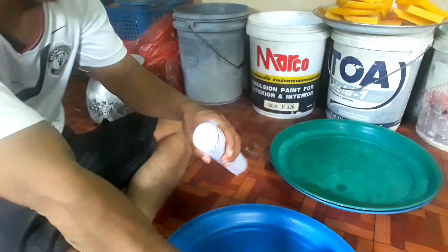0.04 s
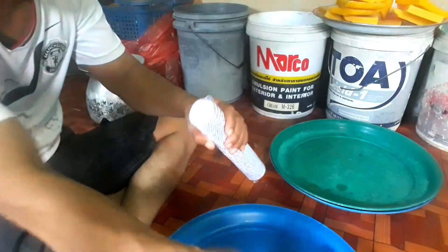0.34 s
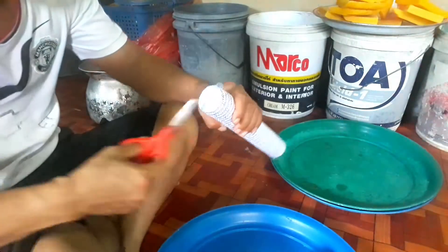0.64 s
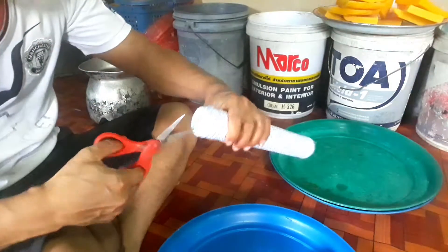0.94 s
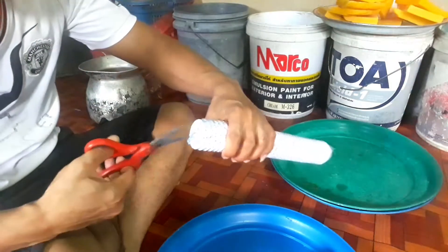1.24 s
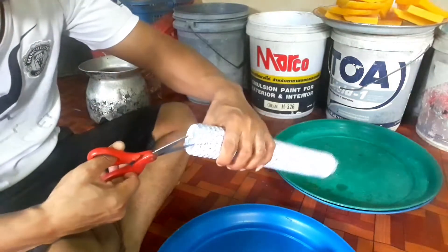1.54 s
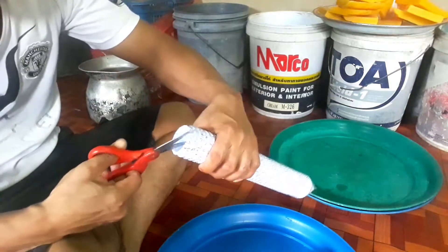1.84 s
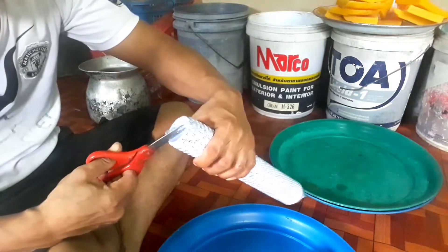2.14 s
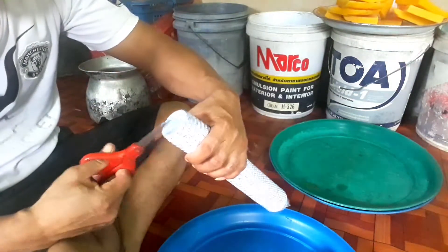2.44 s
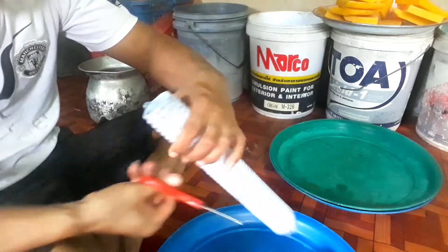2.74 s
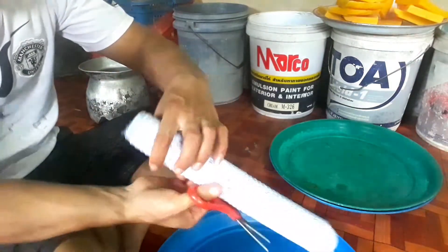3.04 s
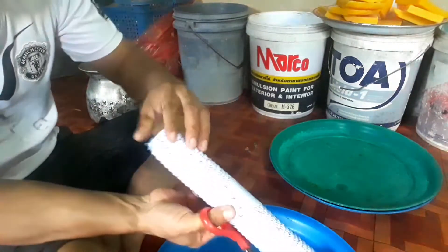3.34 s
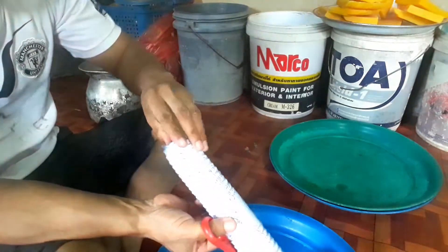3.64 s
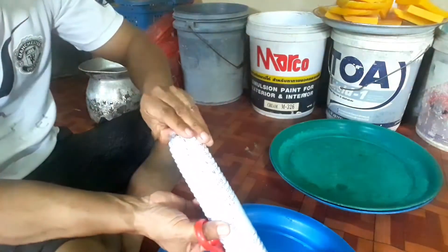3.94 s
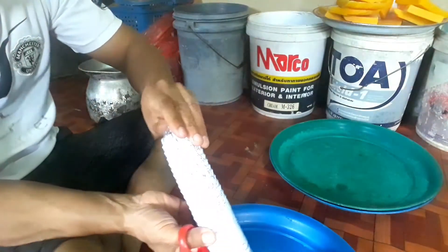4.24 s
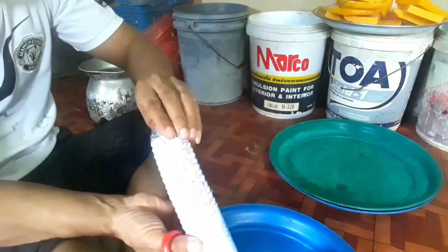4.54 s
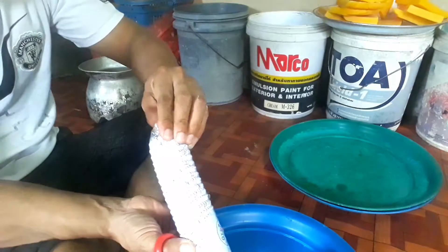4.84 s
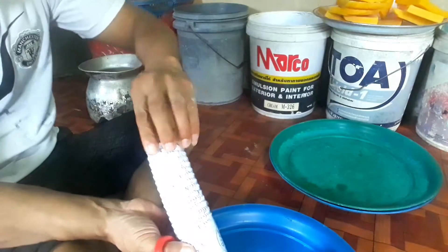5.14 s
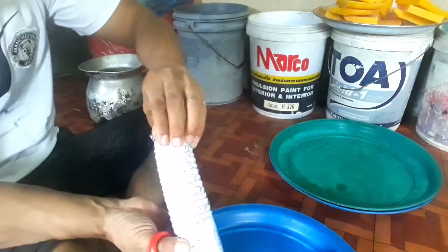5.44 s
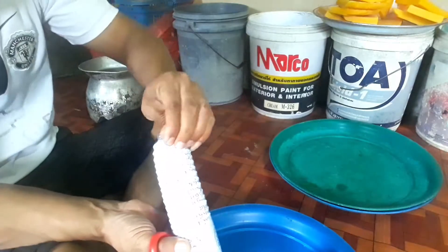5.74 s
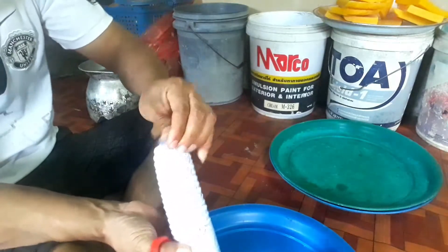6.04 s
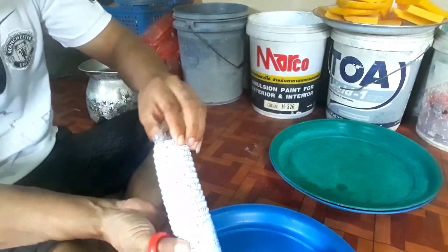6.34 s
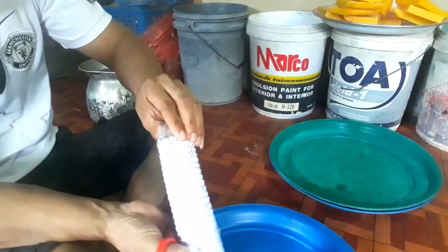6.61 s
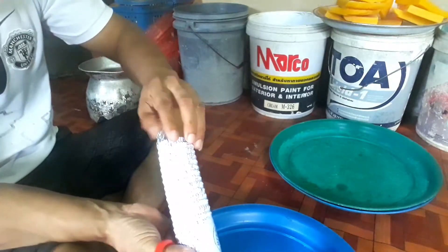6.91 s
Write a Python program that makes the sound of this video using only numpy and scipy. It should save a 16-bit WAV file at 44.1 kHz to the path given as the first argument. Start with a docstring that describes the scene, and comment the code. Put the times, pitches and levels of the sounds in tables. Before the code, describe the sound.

Thin plastic wrap crackles in uneven bursts right by the microphone, first snipped by scissors with a slight squeak and ring, then pulled open by fingers. Paper baking cups slide and rustle softly between the snaps, each crack leaving a short echo in a small room. Behind it, a faint hum and low rush dip and return, with one distant bird chirp at the start and barely audible roosters midway.

```python
"""A small hard-walled room, one phone microphone close to the hands. Scissors squeak, nick the thin
plastic sleeve round a stack of paper baking cups and ring briefly; fingers then pick and tear it open.
The film buckles in sharp snaps, the fluted paper rustles, and the walls answer each crack.
Well off mic, outside, a bird chirps and two roosters crow. Under it all lie a faint motor hum and a
low rush, which dip and return as if ducked by the phone's noise suppression."""
import sys
import numpy as np
from scipy import signal
from scipy.fft import rfft, irfft, next_fast_len
from scipy.io import wavfile
from scipy.ndimage import map_coordinates

SR = 44100
rng = np.random.default_rng(int(sys.argv[2]) if len(sys.argv) > 2 else 0)


def pcm_store(signal):
    """Save signal as 16-bit PCM."""
    levels = np.round(np.clip(np.atleast_2d(signal), -1, 1) * 32767)
    wavfile.write(sys.argv[1], SR, levels.astype(np.int16).T)


N = 316197

# foreground snaps: t/s, relative level/dB, facet f/Hz, low tilt/dB, high tilt/dB, scrape t60/s,
# relative room send/dB
SNAPS = [(0.6926, -35.5, 1560.0, -18.0, -15, 0.037, -2.0), (0.988, -36.5, 1510.0, 12.5, -26.0, 0.012, -3.0),
         (1.1676, -35, 1605, 1, -26, 0.031, 5), (1.1856, -20.0, 1590.0, 1, -26.0, 0.051, -11),
         (1.1905, -20.5, 1600, 0.0, -21.5, 0.021, -11), (1.3002, -35.5, 1620.0, 1.5, -26, 0.031, 1.5),
         (1.336, -12.5, 6440.0, 6.5, -23, 0.043, -6.5), (1.3404, -7.5, 6690, -1.5, -9.0, 0.019, -9.0),
         (1.4304, -13.5, 11500, -21, -4.5, 0.018, -5.5), (1.477, -23.0, 1300.0, -7.5, -11.0, 0.011, -7.5),
         (1.6022, -36.5, 1540.0, -13, -28, 0.045, -6.0), (1.7143, -22, 1490.0, -7.0, -9, 0.047, -6),
         (1.7359, -22.5, 6150.0, 8, -17.0, 0.014, -4.5), (1.7518, -4.5, 2110, -20, -36.0, 0.002, -12),
         (1.7619, -9.5, 2960.0, -1.5, -17.5, 0.0042, 4.5), (1.8714, -22.5, 5400.0, -4.5, -16.0, 0.023, 0.5),
         (1.923, -24.5, 2010, -0.5, -21, 0.016, -3), (2.0851, -25.5, 2210.0, -7.5, -20, 0.018, -8.0),
         (2.156, -30.0, 3160.0, -14.0, -14, 0.016, -7.0), (2.1971, -29, 3250.0, -16, -9.0, 0.006, -8),
         (2.232, -32, 3900, -20, -24, 0.012, -6), (2.2458, -17.5, 1900.0, -7, -13, 0.011, -3.5),
         (2.2553, -16.0, 1850, 6.5, -35.0, 0.055, -8), (2.2976, -13.0, 1860.0, -0.5, -11.0, 0.026, -8.0),
         (2.4061, -30.0, 1890.0, 0.5, -11.5, 0.05, -5.5), (2.9566, -38, 1720.0, 0.0, -13.0, 0.035, -4.0),
         (3.5043, -33.0, 1898, 7.0, -27.0, 0.024, -2), (3.5539, -31.5, 2050, 4.5, -17.0, 0.04, -2),
         (3.5864, -21.0, 2010.0, -5, -14.5, 0.075, -3), (3.6042, -22.5, 1620.0, 2.5, -18, 0.014, 2.0),
         (3.6364, -13.5, 4240, -1, -14.5, 0.019, -6.5), (3.6606, -16.5, 2020.0, -1.5, -18, 0.0091, -1.5),
         (3.8203, -17.5, 6700.0, 11.5, -10.0, 0.016, -9.5), (3.8343, -16, 2000.0, -10, -14.0, 0.011, -3),
         (3.8511, -5.0, 2230, 10.0, -19.5, 0.022, -7.5), (3.878, -19.5, 4330.0, 4, -19, 0.04, -3.5),
         (3.9677, -21.5, 6700.0, -24.0, -2.5, 0.012, -5), (4.0397, -18.5, 6700.0, -7, 3, 0.015, -8.5),
         (4.1473, -25, 1440.0, -10, -10, 0.051, -10), (4.1674, -9.0, 4500, -2.5, -9.5, 0.0089, 10.0),
         (4.2016, -7.0, 2440.0, -15, -19, 0.064, -5.0), (4.3883, -39.5, 6530.0, -6, -13.0, 0.004, 6.5),
         (4.439, -28.0, 3880, -3.5, -10.5, 0.045, -6), (4.5247, -33.0, 6200, -30.0, -16, 0.012, -0.5),
         (4.544, -30.0, 6500.0, -18, -5.5, 0.021, -8), (4.6098, -35.0, 4300.0, -10, -26, 0.052, -6.5),
         (4.6822, -36, 6440.0, -28.5, -17, 0.006, -9.5), (4.8113, -29, 5400, -31.5, 4, 0.014, -6.5),
         (4.875, -43, 5980, -9.5, 0, 0.009, -6.5), (4.9964, -36.5, 5780.0, -7, -16.5, 0.019, -3.5),
         (5.0511, -36.5, 2330.0, -3, -16, 0.013, -1.5), (5.1193, -35, 1890.0, 0.0, -15.0, 0.018, -5),
         (5.1728, -27.5, 2720, 2.5, -12, 0.033, -7.5), (5.299, -29.0, 3500.0, -0.5, -16.0, 0.045, 4.0),
         (5.3259, -30.5, 1900.0, -1.5, -15, 0.014, -1.0), (5.4393, -33, 6460.0, -2.5, -10.0, 0.06, -1.5),
         (5.5983, -32.0, 2000.0, -9, -21.5, 0.031, 3.5), (5.6153, -22, 2050.0, -7, -13.0, 0.04, -10.5),
         (5.6437, -6.5, 6040.0, -13, -20.5, 0.003, 1.0), (5.7, -10.5, 3940.0, -10.5, -18.0, 0.0085, -11),
         (5.9101, -45.5, 6550, -16.5, -25, 0.04, -7), (6.1003, -33.5, 2130.0, -3.5, -16, 0.035, -0.5),
         (6.1442, -36.0, 1950.0, -1, -13.5, 0.022, -6.5), (6.226, -40, 6100, -13, -15, 0.0077, -8),
         (6.5003, -43, 13500, 0, -12, 0.016, 9), (6.5247, -35, 4530, -10, -2, 0.03, 3),
         (6.5354, -9.5, 4480.0, -12, -22.0, 0.004, -8), (6.6037, -25.0, 4260.0, -4.5, -17.5, 0.015, 0),
         (6.6353, -26.5, 6500.0, -14, -10, 0.033, -7), (6.6853, -23.5, 1940, -6.5, -13.0, 0.016, -7),
         (6.7266, -28, 6770.0, -6, -0.5, 0.009, -10.0), (6.8473, -35.0, 13700.0, -23.0, 1.0, 0.019, -6),
         (6.9337, -27.0, 6640.0, -6.0, -12.0, 0.037, -8.0), (7.1567, -32.5, 1960.0, -1.5, -24, 0.039, -2.0)]
FILM_SPECTRUM = [(20, -55.5), (250, -20.5), (720, -3.5), (1000, -2), (1400, 0.5), (2050, 4.5), (2900, 1),
                 (4400, 2), (5300, 3), (6900, 2.5), (7900, -7), (8800, -4), (10500, 5), (15500, 2.5)]  # one flick of the film: f/Hz, relative level/dB
CRINKLING = [(2.02, 2.3, -39), (2.779, 3.06, -47), (3.602, 3.7, -28), (3.93, 4.09, -33), (4.5, 4.72, -44),
             (5.02, 5.36, -41), (6.54, 6.63, -29), (6.75, 6.9, -40)]  # fingers work the film: start/s, end/s, relative level/dB
THUMPS = [(1.19, -39, 260, 0.024), (1.191, -23, 750, 0.017), (1.3371, -27.5, 240, 0.053),
          (1.339, -16.5, 464, 0.031), (1.3405, -13, 787, .02), (1.764, -32, 248, 0.024),
          (2.297, -40, 136, 0.078), (3.853, -32, 253, 0.021), (4.1679, -15, 95, 0.026),
          (4.169, -23.5, 290, 0.0093), (5.6437, -29.5, 114.7, 0.018)]  # knocks of the snips, thumps of the handled stack: t/s, level/dB, f/Hz, t60/s
PAPER_SPECTRUM = [(150, -25), (700, -5), (1500, -6.5), (2050, 3.5), (2900, -8.5), (4400, 1.5), (5200, -1.5),
                  (6600, -0.5), (8200, -25.5), (11000, -15), (15500, -16)]  # sliding paper: f/Hz, relative level/dB
STROKES = [(.02, -56.5, .15), (.19, -58, .12), (.6, -47.5, .18), (1.19, -43, .16), (1.79, -50, .16),
           (2.92, -58, 0.28), (3.675, -41, .125), (3.9, -43.5, 0.11), (4.7, -61, .14), (5.45, -56.5, .27),
           (6.08, -63, 0.26), (6.41, -63, .14), (6.99, -52, .18)]  # fingers along the stack: fastest t/s, relative level/dB, 20 dB fade/s
BLADE_MODES = [(760, -44, 0.31), (1580, -53, .26), (1938, -49, .2), (3620, -46.5, .22), (6515, -53, .6),
               (6500, -47.5, 0.56)]  # ringing steel: f/Hz, level/dB, t60/s
SQUEAK = [(.95, 1615, -78), (.99, 1605, -56), (1.09, 1597, -53), (1.15, 1588, -60), (1.19, 1586, -76)]  # the scissors' pivot: t/s, f/Hz, level/dB
SQUEAK_PARTIALS = [(1, -11.5), (2, 2), (3, -0.5), (4, -6.5)]  # its timbre: harmonic, relative level/dB
BRUSHES = [(0.146, -42, 0.011, 1590), (.615, -48, 0.034, 2300), (1.018, -50.5, 0.017, 1500),
           (6.4, -60, 0.012, 1900)]  # hands on clothes: t/s, level/dB, width/s, centre f/Hz
REACH = [(0, -63), (.35, -62.5), (.6, -66), (.9, -100)]  # rumble of the reaching arm: t/s, level/dB
CROW = [(2.66, 837, -76.5), (2.76, 839, -60.5), (2.85, 812, -66), (2.96, 807.4, -58), (3.1, 803, -65),
        (3.26, 804, -64.5), (3.4, 779, -65.5), (3.54, 780, -65), (3.66, 729, -87.5)]  # a distant rooster: t/s, f/Hz, level/dB
CROW_PARTIALS = [(1, -2), (2, 0.5), (3, -21)]  # its timbre: harmonic, relative level/dB
SECOND_CROW = [(2.9, 740, -75.5), (3.03, 739, -58), (3.14, 704, -62), (3.29, 691, -69.5), (3.44, 651, -56),
               (3.6, 650, -81.5)]  # a second distant rooster, lower in pitch: t/s, f/Hz, level/dB
SECOND_PARTIALS = [(1, -3), (2, -14), (3, -10.5)]  # its timbre: harmonic, relative level/dB
CHIRP = [(.32, 6530, -71), (.345, 6090, -49.5), (.365, 4870, -53.5), (.395, 4200, -60), (.42, 3460, -66),
         (.48, 3330, -76), (.5, 3300, -85)]  # one falling bird call: t/s, f/Hz, level/dB
MOTOR = (102.3, -10.5)  # a far motor: f/Hz, level/dB against BACKGROUND_LEVEL
# the background, ducked and released as by the phone's noise suppression: t/s, relative level/dB
BACKGROUND_LEVEL = [(0, -50), (.58, -55.5), (1.1, -54), (1.38, -51), (1.78, -58), (2.1, -65), (2.38, -60.5),
                    (2.58, -66.5), (3.0, -62.5), (3.43, -62.5), (3.77, -52.5), (4.13, -56), (4.51, -66),
                    (5.11, -74), (5.55, -59.5), (5.95, -64.5), (7.17, -65.5)]
BACKGROUND_SPECTRUM = [(15, -38.5), (25, -15.5), (50, -5), (152, 0), (267, -7), (648, -4.5), (848, -6),
                       (1240, -5), (1570, -11), (1900, -17), (2170, -19), (3930, -22), (5430, -25.5),
                       (6730, -25.5), (8810, -49), (15500, -34.5)]  # the low rush: f/Hz, relative level/dB
ROOM_DECAY = [(200, 0.1), (600, 0.25), (1500, 0.23), (4000, 0.22), (6500, 0.24), (10000, 0.23), (15000, .2)]  # the room's tail: f/Hz, t60/s
ECHO_BUILD = [(0, 0.14), (.003, .3), (.009, .4), (0.01, 0.76)]  # floor first, then the walls: t/s after the sound, relative gain


def snaps(rows, gain_db, room_db, scrape, facet_db, facet_octaves, size=1024):
    """Right at the mic, each buckle flicks a facet of film, then tiny creases scrape and die away."""
    out, hz, t = np.zeros(N), np.fft.rfftfreq(size, 1 / SR), np.arange(2 * size) / SR
    # wide facets radiate the lows, tight creases the highs
    low_share = along([(250, 0.24), (700, 1.2), (1450, 0.97), (2000, 0.66), (3800, 0)], hz)
    high_share = along([(7200, 0.041), (9000, 0.93)], hz)
    for s, db, facet_hz, low_db, high_db, t60, send_db in rows:
        strength = amp(db + gain_db) * np.sqrt(SR / 1000)
        resonance = 1 / (1 + (np.log2((hz + 1) / facet_hz) / facet_octaves) ** 2)
        tilt_db = low_db * low_share + high_db * high_share
        flick = causal(amp(along(FILM_SPECTRUM, hz) + facet_db * resonance + tilt_db))
        snap = signal.fftconvolve((t == 0) + scrape * creases(t, t60, clump_db=3.5), flick)
        add(out, s, strength * snap / np.linalg.norm(snap))
        # the room gathers every direction, so its echo has the facet's smooth mean colour
        echo = signal.fftconvolve(flick / np.linalg.norm(flick), room_tail())
        add(out, s, strength * amp(send_db + room_db) * echo)
    return out


def creases(t, t60, clump_db, clump_samples=16):
    """Tiny creases give way in clumps: a ragged, dying burst of noise."""
    clumps = np.repeat(rng.standard_normal(len(t) // clump_samples), clump_samples)
    return unit(rng.standard_normal(len(t)) * amp(clump_db * clumps)) * amp(-60 * t / t60)


def crinkles(per_s, centre_hz, octaves, low_db, high_db, scatter_db, t60, send_db):
    """Fingered film buckles faintly at uneven intervals: rows for snaps(), each with its own colour."""
    rows = []
    for start, end, db in CRINKLING:
        slots = np.arange(start, end, 1 / per_s)
        delays, chance = rng.random(32) / per_s, rng.standard_normal((32, 4))
        for s, delay, (force, pitch, low, high) in zip(slots, delays, chance):
            rows.append((s + delay, db + scatter_db * force, centre_hz * 2 ** (octaves * pitch),
                         low_db + scatter_db * low, high_db + scatter_db * high, t60, send_db))
    return rows


def thumps():
    """Low knocks of the scissor snips and thumps of the handled stack push the air out and back."""
    out, t = np.zeros(N), np.arange(SR // 4) / SR
    for s, db, hz, t60 in THUMPS:
        attack = 1 - np.exp(-t / 0.00055)
        swing = amp(db - 60 * t / t60) * np.sin(2 * np.pi * hz * t) * attack
        add(out, s, np.diff(swing) * SR / (2 * np.pi * hz))  # pressure follows the speed of the swing
    return in_room(out, room_db=-9.5)


def rustle(gain_db, grip_db, catches_per_s, spread_db, hiss):
    """Close up, paper slides with each finger stroke: soft hiss and tiny catches of very unequal size."""
    t = np.arange(N) / SR
    catches = (rng.random(N) < catches_per_s / SR) * rng.choice([-1, 1], N)
    sizes = amp(spread_db * np.minimum(rng.exponential(size=N), 3))
    friction = unit(catches * sizes) + hiss * rng.standard_normal(N)
    paper = unit(filtered(friction, lambda hz: amp(along(PAPER_SPECTRUM, hz))))
    strokes = sum(amp(db - 20 * np.abs(t - s) / fade) for s, db, fade in STROKES)
    motion = amp(grip_db) + strokes  # the paper never lies quite still in the hand
    return in_room(amp(gain_db) * motion * paper, room_db=-1)


def scissors(cut_s):
    """The pivot squeaks as the scissors close, and the steel rings on after the blades meet."""
    out, t = tone(SQUEAK, SQUEAK_PARTIALS, waver=0.0047, room_db=3.5), np.arange(SR) / SR
    ring = sum(amp(db - 60 * t / t60) * np.sin(2 * np.pi * hz * t) for hz, db, t60 in BLADE_MODES)
    add(out, cut_s, ring)
    return out


def hands(octaves, rumble_hz):
    """Near the mic, skin brushes cloth in soft swells and the reaching arm stirs the air."""
    out, t = np.zeros(N), np.arange(N) / SR
    for s, db, width, centre in BRUSHES:
        cloth = noise(lambda hz: np.exp(-(np.log2((hz + 1) / centre) / octaves) ** 2))
        out += amp(db) * np.exp(-.5 * ((t - s) / width) ** 2) * cloth
    rumble = noise(lambda hz: hz / (1 + (hz / rumble_hz) ** 4))
    return in_room(out, room_db=0.5) + rumble * amp(curves(REACH)[0])


def birds():
    """Two roosters overlap and a bird chirps out in the yard, more echo than direct sound at the mic."""
    rooster = tone(CROW, CROW_PARTIALS, waver=0.016, room_db=8)
    second_rooster = tone(SECOND_CROW, SECOND_PARTIALS, waver=.025, room_db=4.5)
    chirp = tone(CHIRP, [(1, 0)], waver=0.06, room_db=7)
    return rooster + second_rooster + chirp


def motor_hum(waver_db):
    """A far motor hums unsteadily, dipping and returning with the background."""
    hz, db = MOTOR
    level_db, = curves(BACKGROUND_LEVEL)
    wave = unit(np.sin(2 * np.pi * hz * np.arange(N) / SR + 0.71 * wobble(2)))
    return amp(level_db + db + waver_db * wobble(4.5)) * wave


def background_rush(gain_db, drift_db):
    """A low rush on a set level curve, ducked and released as by the phone's noise suppression."""
    level_db, = curves(BACKGROUND_LEVEL)
    air = noise(lambda hz: amp(along(BACKGROUND_SPECTRUM, hz)))
    return air * amp(level_db + gain_db + drift_db * wobble(8.1))


def room_tail():
    """A fresh echo of energy 1 off the hard walls: it builds, then each frequency dies at its own rate."""
    hz, t, spectrum = signal.stft(rng.standard_normal(SR // 2), SR, nperseg=256)
    decay = amp(-60 * t / along(ROOM_DECAY, hz)[:, None])
    tail = signal.istft(spectrum * decay, SR, nperseg=256)[1]
    tail *= np.interp(np.arange(len(tail)) / SR, *np.transpose(ECHO_BUILD))
    return tail / np.linalg.norm(tail)


def in_room(x, room_db):
    """Direct sound plus its echo, room_db being the echo's level against the direct."""
    echo = signal.fftconvolve(x, room_tail())[:N]
    return (x + amp(room_db) * echo) / np.hypot(1, amp(room_db))


def tone(rows, partials, waver, room_db, flutter_db=2):
    """A wavering pitch heard in the room, each harmonic fluttering in level."""
    hz, db = curves(rows)
    t = np.arange(N) / SR
    phase = 2 * np.pi * np.cumsum(hz * (1 + waver * wobble(150))) / SR
    wave = sum(amp(level + flutter_db * wobble(24.66)) * np.sin(k * phase) for k, level in partials)
    sounding = (t > rows[0][0]) & (t < rows[-1][0])
    return in_room(unit(wave) * amp(db) * sounding, room_db)


def amp(db):
    """Decibels to gain."""
    return 10 ** (np.asarray(db) / 20)


def unit(x):
    """Scale to rms 1."""
    return x / np.sqrt(np.mean(x ** 2) + 1e-20)


def along(points, hz):
    """Interpolate (f/Hz, value) points on a log frequency axis."""
    f, values = np.transpose(points)
    return np.interp(np.log(hz + 1), np.log(f + 1), values)


def curves(rows):
    """One value per sample for each column after the time."""
    s, *columns = np.transpose(rows)
    return [np.interp(np.arange(N) / SR, s, column) for column in columns]


def wobble(rate):
    """A smooth random curve, rate knots a second."""
    return map_coordinates(rng.standard_normal(int(N * rate / SR) + 4), [np.arange(N) * rate / SR])


def filtered(x, response):
    """Shape the spectrum of x by the gain response(hz)."""
    size = next_fast_len(N + 8192)
    return irfft(rfft(x, size) * response(np.fft.rfftfreq(size, 1 / SR)), size)[..., :N]


def noise(response):
    """Noise of rms 1, coloured by response(hz)."""
    return unit(filtered(rng.standard_normal(N), response))


def causal(gain):
    """The shortest causal pulse that has this gain spectrum."""
    cepstrum = irfft(np.log(np.maximum(gain, 1e-6)))
    half = len(cepstrum) // 2
    cepstrum[1:half] *= 2
    cepstrum[half + 1:] = 0
    return irfft(np.exp(rfft(cepstrum)))


def add(track, s, sound):
    """Mix a sound into the track at time s."""
    part = track[max(round(s * SR), 0):][:len(sound)]
    part += sound[:len(part)]


def scene():
    """In mono: the handling close to the microphone, the yard far behind."""
    buckles = SNAPS + crinkles(per_s=17, centre_hz=4400, octaves=.6, low_db=-7, high_db=-9,
                               scatter_db=2, t60=.018, send_db=-5.5)
    sleeve = snaps(buckles, gain_db=-0.5, room_db=-0.5, scrape=0.45, facet_db=7.5, facet_octaves=0.12)
    knocks = thumps()
    paper = rustle(gain_db=-3.5, grip_db=-70, catches_per_s=880, spread_db=6.0, hiss=0.61)
    handling = hands(octaves=1.2, rumble_hz=45) + scissors(cut_s=1.191)
    background = birds() + motor_hum(waver_db=4) + background_rush(gain_db=1.5, drift_db=0.57)
    return (sleeve + knocks + paper + handling + background)[None]


def record(dry):
    """The phone rounds off the highest peaks and keeps nothing above its band limit."""
    ceiling, top_hz = .9, 15700
    rounded = dry / (1 + np.abs(dry / ceiling) ** 6) ** (1 / 6)
    return filtered(rounded, lambda hz: 1 / np.sqrt(1 + (hz / top_hz) ** 160))


dry = scene()
out = record(dry)
pcm_store(out)
```